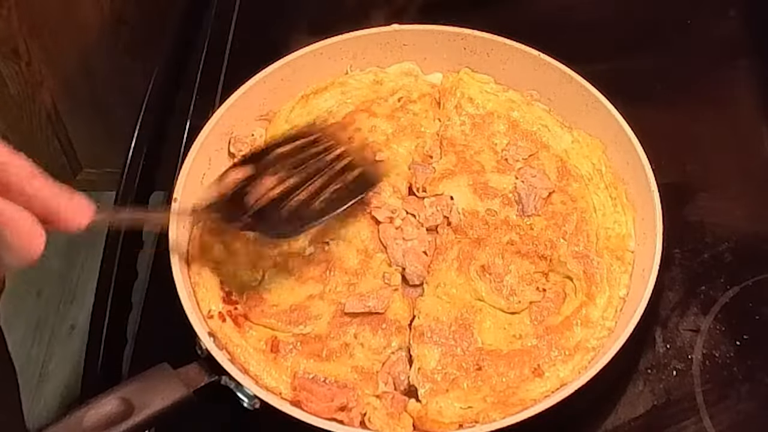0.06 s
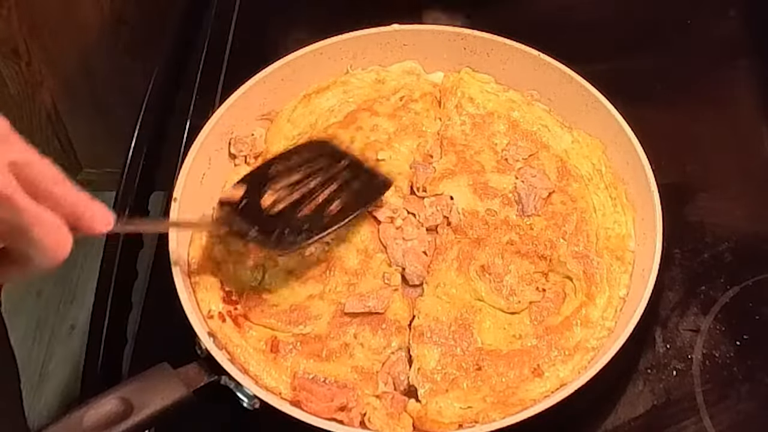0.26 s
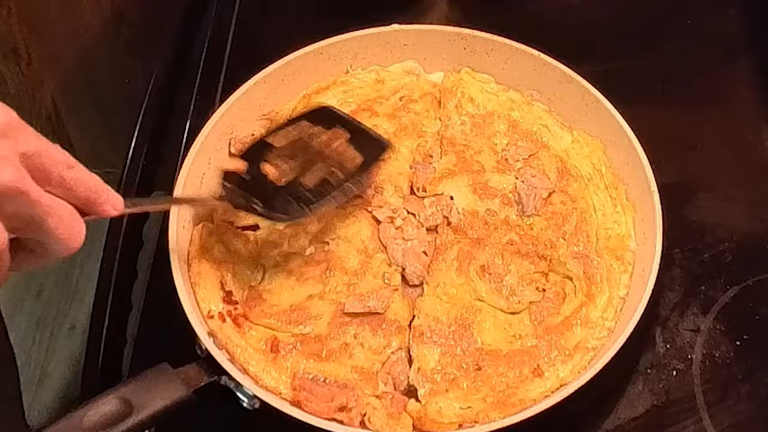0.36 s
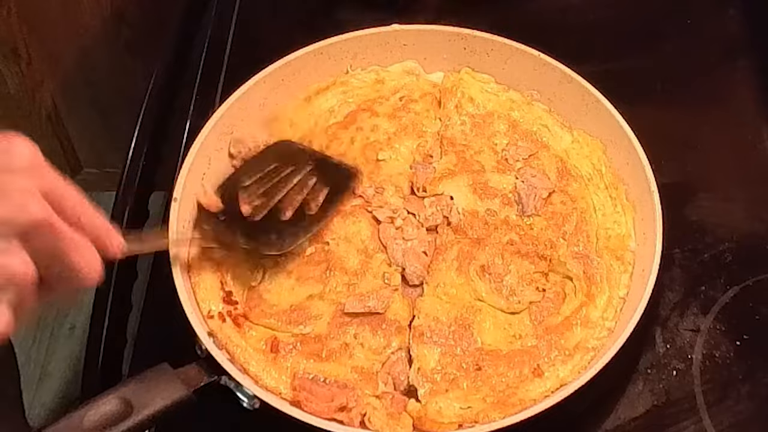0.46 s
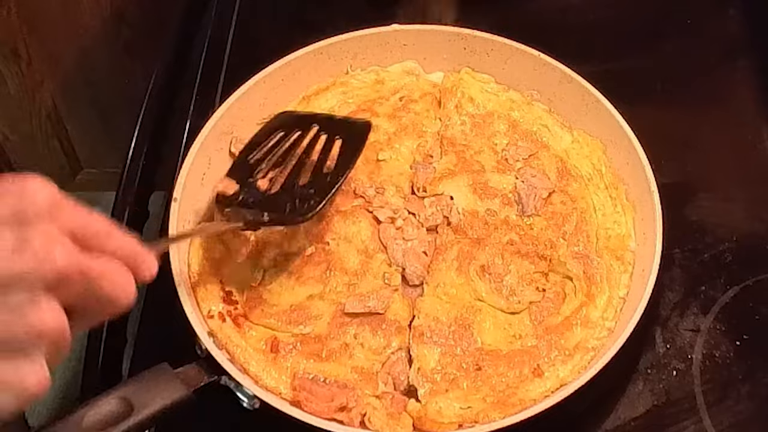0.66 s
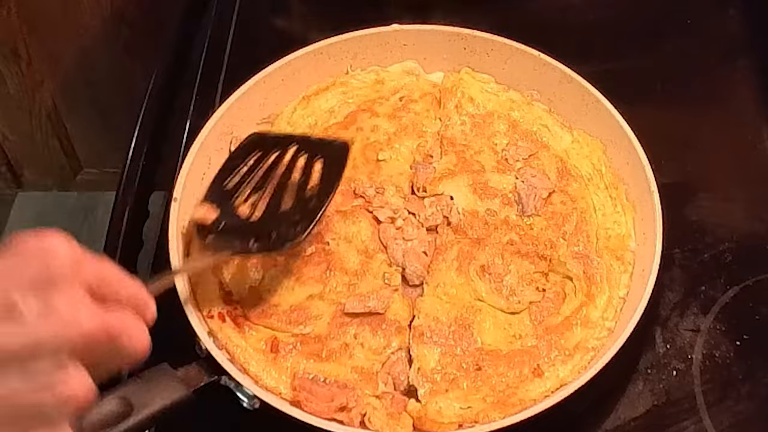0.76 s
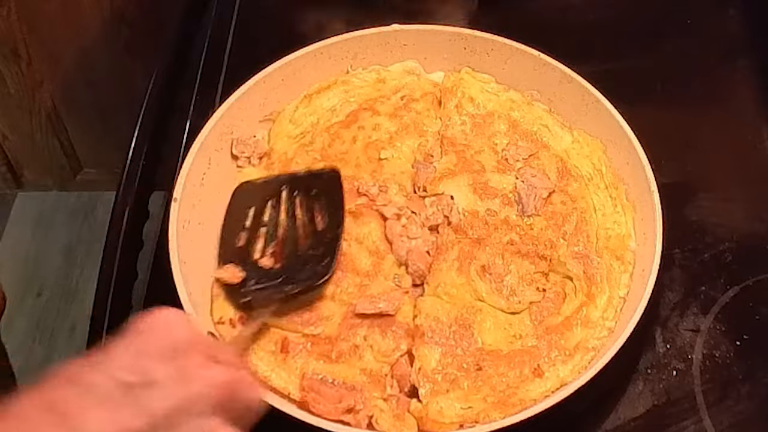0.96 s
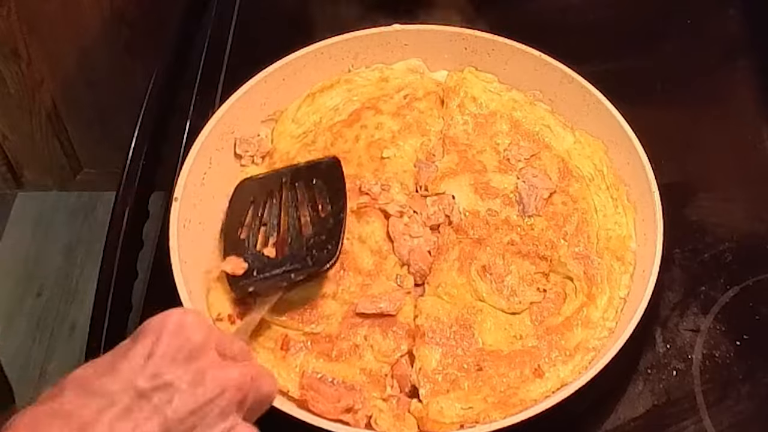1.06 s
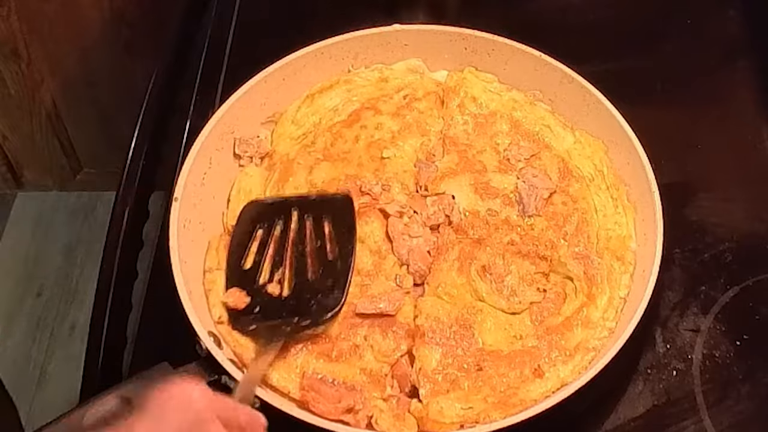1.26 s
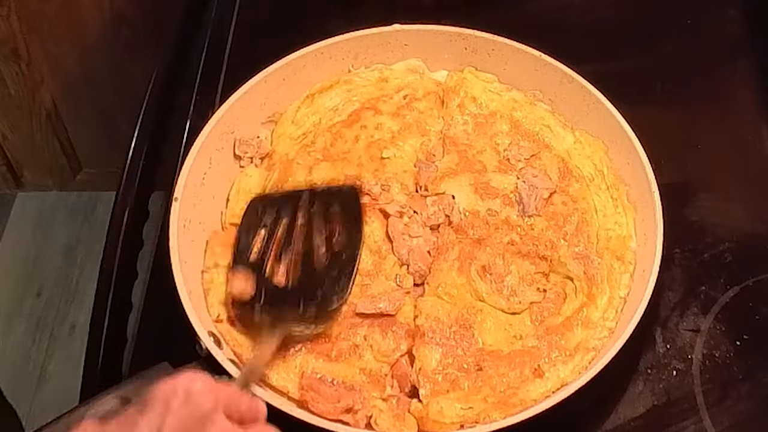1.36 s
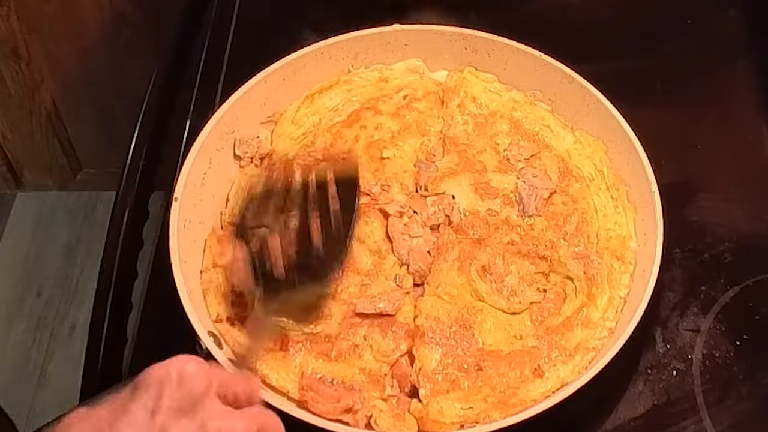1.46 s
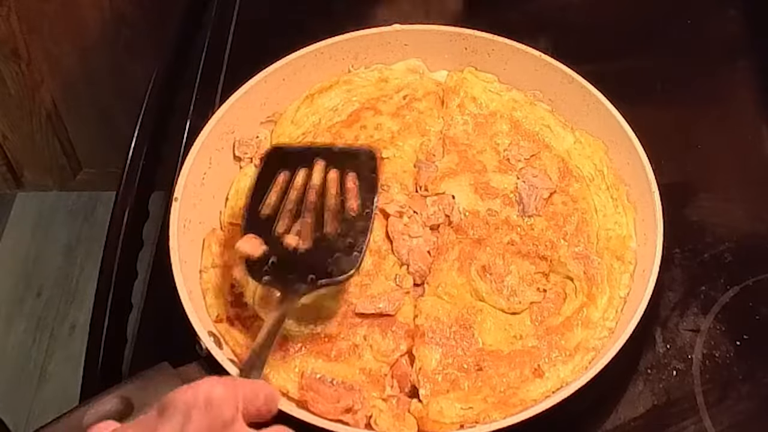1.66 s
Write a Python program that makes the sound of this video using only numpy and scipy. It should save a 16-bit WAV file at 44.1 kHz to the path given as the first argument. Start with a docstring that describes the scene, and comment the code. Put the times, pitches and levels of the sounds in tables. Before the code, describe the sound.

A slotted spatula knocks a frying pan three times, first loudest, over soft sizzling and scrapes

```python
"""Omelette in a frying pan

An omelette sizzles in a pan on a kitchen hob, heard from just above by a pair of microphones.
A slotted spatula knocks the pan three times: short sine-wavelet cracks with a noise snap, clatter and thuds
of shaped noise, and sine modes that ring. Lighter ticks are short noise snaps; scrapes are crowds of tiny
clicks with soft noise bumps. The fat is dense random clicks over hiss, above a low noise background;
early and diffuse echoes answer the knocks."""
import sys
import numpy as np
from scipy import signal
from scipy.fft import rfft, irfft
from scipy.io import wavfile
from scipy.ndimage import uniform_filter1d

SR = 44100
rng = np.random.default_rng(int(sys.argv[2]) if len(sys.argv) > 2 else 0)


def to_wav(s):
    """Save 16-bit WAV."""
    ch = np.atleast_2d(s).T  # columns
    pcm = np.round(np.clip(ch, -1, 1) * 32767)  # PCM
    wavfile.write(sys.argv[1], SR, pcm.astype(np.int16))


N = 74970
T = np.arange(N) / SR
HZ = np.fft.rfftfreq(N, 1 / SR)

# Spatula knocks. Each row: start in seconds, crack level in dB, crack centre in Hz, clatter level in dB,
# thud level in dB, top of the clatter in Hz, extra room level in dB.
KNOCK_BLOWS = [(0.2201, 6, 2650, 11.5, 6.5, 6900, 4.5), (0.5655, -7, 2480, 0.5, 1.5, 5900, -6.5),
               (0.9613, -7.5, 2130, -0.5, 1.5, 5100, -4)]
# Push of the pan on the hob, as a spectrum shape. Each row: frequency in Hz, relative level in dB per Hz.
THUD_SPECTRUM = [(20, -38), (100, -18), (145, -5.5), (250, 1), (380, -4.5), (600, -4.5), (950, -8.5),
                 (1300, -17), (4000, -44.5)]
# Phase between the microphones. Each row: frequency in Hz, radians by which the left leads.
LEFT_LEAD = [(100, 0), (400, -.06), (1200, -.28), (2800, -.6), (5500, -.5), (9500, -.6), (11500, -3)]


def amp(db):
    """Decibels to gain."""
    return 10 ** (np.asarray(db) / 20)


def read(points, hz):
    """Reads a table on a log-frequency axis."""
    f, value = np.transpose(points)
    return np.interp(np.log(hz + 1), np.log(f), value)


def unit_rms(x):
    """Scales to rms 1 over all channels together."""
    return x / np.sqrt(np.mean(x ** 2) + 1e-20)


def unit_energy(x):
    """Scales to a mean energy of 1 per channel."""
    return unit_rms(x) / np.sqrt(N)


def add(mix, s, sound):
    """Mixes a sound in at time s."""
    at = max(round(s * SR), 0)
    mix[:, at:] += sound[:, :N - at]


def colour(x, gain):
    """Minimum-phase filter with the given gain at each frequency: no sound ahead of its cause."""
    cepstrum = irfft(np.log(np.maximum(gain, 1e-5)), N)
    # Folding the cepstrum onto positive time makes the filter causal
    cepstrum[1:N // 2] *= 2
    cepstrum[N // 2 + 1:] = 0
    return irfft(rfft(x) * np.exp(rfft(cepstrum)), N)


def hump(hz, octaves):
    """Gain of a broad resonance about hz."""
    return 1 / (1 + (np.log2((HZ + 1) / hz) / octaves) ** 2)


def ports(pair):
    """Blends two unrelated signals into the partly alike sound at the two microphones."""
    # Each row: frequency in Hz, likeness of left and right from 0 to 1.
    likeness = [(25, 0.95), (140, 0.94), (280, .95), (550, 0.9), (1200, 0.86), (2600, 0.64), (5500, 0.58),
                (9000, 0.1), (12000, 0.45)]
    a, b = rfft(pair)
    same = read(likeness, HZ)
    common = np.sqrt((1 + same) / 2) * a
    apart = np.sqrt((1 - same) / 2) * b
    left = common + apart
    right = (common - apart) * np.exp(-1j * read(LEFT_LEAD, HZ))
    return irfft(np.array([left, right]), N)


def noise():
    """White noise at both microphones."""
    return ports(rng.standard_normal((2, N)))


def grains(per_s, spread_db):
    """Tiny clicks at random moments, a few much larger than the rest."""
    size = amp(spread_db * np.minimum(rng.exponential(1, (2, N)), 5))
    sign = rng.choice([-1, 1], (2, N))
    present = rng.random((2, N)) < per_s / SR
    return unit_rms(ports(size * sign * present))


def room_tail():
    """Diffuse kitchen echo: noise that swells in, each band dying at its own speed."""
    # Kitchen reverberation. Each row: frequency in Hz, time to fall 60 dB in seconds.
    kitchen = [(100, 0.45), (300, 0.34), (800, 0.4), (2200, 0.44), (5000, 0.34), (10000, 0.57)]
    rise_s = 0.0052
    hz, t, z = signal.stft(noise(), SR, nperseg=256)
    fading = z * amp(-60 * t / read(kitchen, hz)[:, None])
    tail = signal.istft(fading, SR, nperseg=256)[1][:, :N]
    return tail * (1 - np.exp(-(T / rise_s) ** 2))


def burst(gain, rise_s, decay_s, room_db):
    """A short decaying burst of coloured noise, with its diffuse echo."""
    near = noise() * (1 - np.exp(-T / rise_s)) * np.exp(-T / decay_s)
    return unit_energy(colour(near, gain)) + amp(room_db) * unit_energy(colour(room_tail(), gain))


def echoes(x):
    """A sound plus its first, slightly dulled reflections."""
    # Off worktop, wall and ceiling. Each row: delay in seconds, level in dB.
    reflections = [(.0045, -14), (.0165, -28), (.0215, -19), (.0345, -7.5)]
    top_hz = 3240
    dull = colour(x, 1 / np.sqrt(1 + (HZ / top_hz) ** 2))
    out = x.copy()
    for delay_s, db in reflections:
        add(out, delay_s, amp(db) * dull)
    return out


def sizzle():
    """Steam bubbles burst in the fat as random clicks over a fine hiss; body and fizz swell and ebb."""
    # Frying fat, as a spectrum shape. Each row: frequency in Hz, relative level in dB per Hz.
    spectrum = [(200, -25), (700, -9), (1400, -10.5), (1900, -4.5), (2500, 0), (3400, -3), (5000, -5),
                (7500, -7.5), (10500, -7), (13000, -13), (15000, -20.5)]
    # Strength of the frying. Each row: time in seconds, body level in dB, fine fizz level in dB.
    strength = [(0, -43, -54.5), (.15, -45, -56), (.5, -46, -55), (.75, -44.5, -54), (.93, -45.5, -56),
                (1.03, -41.5, -50), (1.17, -41.5, -53), (1.319, -46.5, -55), (1.42, -44, -54.5),
                (1.58, -47.5, -55.5), (1.7, -46.5, -56)]
    bursts_per_s, burst_spread_db = 2600, 1.5
    hiss_share = 0.55  # of the power before colouring
    fizz_hz, flutter_db = 5800, 1.27

    bursts = grains(bursts_per_s, burst_spread_db)
    mixed = np.sqrt(1 - hiss_share) * bursts + np.sqrt(hiss_share) * noise()
    fat = rfft(colour(mixed, amp(read(spectrum, HZ))))
    low = 1 / (1 + (HZ / fizz_hz) ** 4)
    body = unit_rms(irfft(fat * low, N))
    fizz = unit_rms(irfft(fat * (1 - low), N))

    # Two moving averages, in samples, leave a slow random flutter of the level
    smooth = uniform_filter1d(rng.standard_normal(N), size=700)
    flutter = unit_rms(uniform_filter1d(smooth, size=400))
    s, body_db, fizz_db = np.transpose(strength)
    frying = body * amp(np.interp(T, s, body_db)) + fizz * amp(np.interp(T, s, fizz_db))
    return amp(flutter_db * flutter) * frying


def rumble():
    """Steady low background of the kitchen as shaped noise, with a faint wavering narrow-band drone."""
    # Background spectrum shape. Each row: frequency in Hz, relative level in dB per Hz.
    spectrum = [(10, -5), (30, -1), (48, -8), (68, 1), (95, -5.5), (150, -6), (200, -14.5), (250, -5.5),
                (295, -15.5), (345, -4.5), (430, -21.5), (900, -25.5), (2500, -40)]
    rumble_db, drone_db = -50.5, -59
    background = unit_rms(colour(noise(), amp(read(spectrum, HZ))))
    drone = unit_rms(colour(noise(), hump(69.5, octaves=0.14) ** 2))
    return amp(rumble_db) * background + amp(drone_db) * drone


def scrapes():
    """The spatula slides on the food: crowds of tiny slips, and a soft bump given to the pan."""
    # Each row: start in seconds, length in seconds, rub level in dB, soft bump level in dB.
    strokes = [(0.017, .1, -51, -48), (0.887, 0.14, -65, -44.5), (1.368, 0.1, -40, -50),
               (1.499, 0.11, -43, -51), (1.612, 0.034, -34.5, -44), (1.643, 0.047, -42, -55)]
    # Rub spectrum shape. Each row: frequency in Hz, relative level in dB per Hz.
    rub_spectrum = [(100, -62), (450, 3), (900, 4), (1600, 3), (3200, 10), (6000, -4), (14000, -30)]
    rise_s, slips_per_s = 0.008, 3100
    rub = unit_rms(colour(grains(slips_per_s, spread_db=4.5), amp(read(rub_spectrum, HZ))))
    bump = unit_rms(colour(noise(), amp(read(THUD_SPECTRUM, HZ))))
    out = np.zeros((2, N))
    for s, length, rub_db, bump_db in strokes:
        rise = np.clip((T - s) / rise_s, 0, 1)
        fade = np.exp(-2 * np.maximum(T - s, 0) / length)
        out += rise * fade * (amp(rub_db) * rub + amp(bump_db) * bump)
    return out


def ticks():
    """Light ticks of the spatula and pops of fat: single small noise snaps with a little echo."""
    # Each row: start in seconds, level in dB, centre in Hz.
    snaps = [(0.0470, -14.5, 2880), (0.4766, -13.5, 2760), (1.0112, -10.5, 2730), (1.0290, -16, 5200),
             (1.1261, -14.5, 2910), (1.166, -17.5, 4550), (1.3770, -18, 2950), (1.504, -17.5, 4200),
             (1.5101, -15, 2380), (1.556, -27, 4440), (1.6176, -16.5, 3020), (1.6244, -21, 2620)]
    decay_s, octaves, room_db, top_hz = 0.00045, 0.55, -16.5, 10400
    out = np.zeros((2, N))
    soft = 1 / (1 + (HZ / top_hz) ** 4)
    for s, db, hz in snaps:
        add(out, s, amp(db) * burst(hump(hz, octaves) * soft, decay_s / 10, decay_s, room_db))
    return out


def pan_ring(point):
    """Decaying sine modes fed from one strike point; the higher reach the microphones more out of step."""
    # Modes of pan and hob. Each row: frequency in Hz, time to fall 60 dB in seconds,
    # then level in dB at the first, second and third strike point.
    modes = [(152, .26, -23, -37, -48), (199, .28, -33, -41, -30), (226, .36, -29, -33, -40),
             (284, .32, -35, -37, -35), (444, .3, -29, -45, -46), (487, .18, -40, -44, -32),
             (545, .34, -25, -38, -34), (624, .25, -22, -28, -35), (778, .26, -30, -44, -41),
             (965, .2, -34, -41, -39), (1288, .3, -29, -54, -51), (1421, .32, -31, -37, -40),
             (1941, .35, -22, -31, -41), (2090, .15, -35, -41, -39), (2516, .44, -26, -49, -39),
             (2601, .32, -32, -50, -48), (3168, .22, -41, -33, -33), (3950, .11, -37, -38, -38),
             (4553, .22, -33, -46, -48), (5055, .11, -40, -37, -43), (5420, .17, -39, -44, -56)]
    apart_hz = 2200
    twin_hz, twin_share = 14.49, 0.36  # a slightly detuned twin makes each mode beat
    rise_s, early_gain, early_s = 0.0011, 0.61, 0.018  # extra loudness at first, quickly shed

    out = np.zeros((2, N))
    chance = rng.uniform(-1.2, 1, (len(modes), 4))
    for (hz, t60, *level_db), (turn, side, twin_turn, twin_side) in zip(modes, chance):
        spread = np.tanh(hz / apart_hz)
        apart = np.pi * side * spread / 2 - read(LEFT_LEAD, hz)
        phase = 2 * np.pi * hz * T + np.pi * turn + np.array([[0], [apart]])
        twin_phase = np.pi * (twin_turn + np.array([[0], [twin_side * spread]]))
        twin = twin_share * np.sin(phase + 2 * np.pi * twin_hz * T + twin_phase)
        out += amp(level_db[point] - 60 * T / t60) * (np.sin(phase) + twin)
    return out * (1 - np.exp(-T / rise_s)) * (1 + early_gain * np.exp(-T / early_s))


def knocks():
    """Each blow: sine-wavelet crack, noise snap as the blade lands flat, clatter, low thud and pan ring."""
    # Dense ring of spatula and pan, as a spectrum shape. Each row: frequency in Hz, relative level in dB per Hz.
    clatter_spectrum = [(60, -41), (300, 5), (600, -1.5), (1000, -4), (1550, -1), (2300, 4.5), (3300, -3),
                        (5200, -6.5), (8000, -17), (15000, -2)]
    crack_s = 0.0006  # time to the peak of the crack's envelope
    snap_db, snap_delay_s, snap_hz, snap_s = -2, 0.001126, 4560, 0.0002  # level relative to the crack
    clatter_s, clatter_rise_s, clatter_room_db = 0.0086, 0.00024, -5
    thud_s, thud_rise_s, thud_room_db = 0.013, 0.0016, 5
    low_hz = 169  # crack and clatter are thinned below this

    out = np.zeros((2, N))
    for point, row in enumerate(KNOCK_BLOWS):
        s, crack_db, crack_hz, clatter_db, thud_db, top_hz, room_db = row
        soft = 1 / np.sqrt(1 + (HZ / top_hz) ** 8)

        swing = T * np.exp(-(T / crack_s) ** 2 / 2) * np.sin(2 * np.pi * crack_hz * T)
        crack = unit_energy(ports(np.array([swing, 0 * swing])))
        snap = colour(noise() * np.exp(-T / snap_s), hump(snap_hz, octaves=0.49) * np.sqrt(soft))
        add(crack, snap_delay_s, amp(snap_db) * unit_energy(snap))

        clatter_gain = amp(read(clatter_spectrum, HZ)) * soft
        clatter = burst(clatter_gain, clatter_rise_s, clatter_s, clatter_room_db + room_db)
        thud = burst(amp(read(THUD_SPECTRUM, HZ)), thud_rise_s, thud_s, thud_room_db + room_db)

        blow = amp(crack_db) * crack + amp(clatter_db) * unit_energy(clatter)
        blow = colour(blow, HZ ** 2 / (HZ ** 2 + low_hz ** 2))
        add(out, s, echoes(blow) + amp(thud_db) * unit_energy(thud) + pan_ring(point))
    return out


def sway():
    """The last blow lands on the food and rocks the pan: a faint deep bump of decaying noise."""
    level_db, centre_hz, decay_s = -10.5, 46, 0.043
    out = np.zeros((2, N))
    bump = colour(noise() * np.exp(-T / decay_s), hump(centre_hz, octaves=0.8) ** 2)
    add(out, KNOCK_BLOWS[-1][0], amp(level_db) * unit_energy(bump))
    return out


def scene():
    """Everything at the hob."""
    return sizzle() + rumble() + scrapes() + ticks() + knocks() + sway()


def record(dry):
    """The recorder rounds off the highest peaks, then limits the band."""
    overload, cutoff_hz = 0.8, 14300  # overload is the ceiling, full scale being 1
    rounded = dry / (1 + (dry / overload) ** 6) ** (1 / 6)
    lowpass = signal.firwin(255, cutoff_hz, window=("kaiser", 8), fs=SR)
    return signal.oaconvolve(rounded, lowpass[None], "same")


dry = scene()
out = record(dry)
to_wav(out)
```